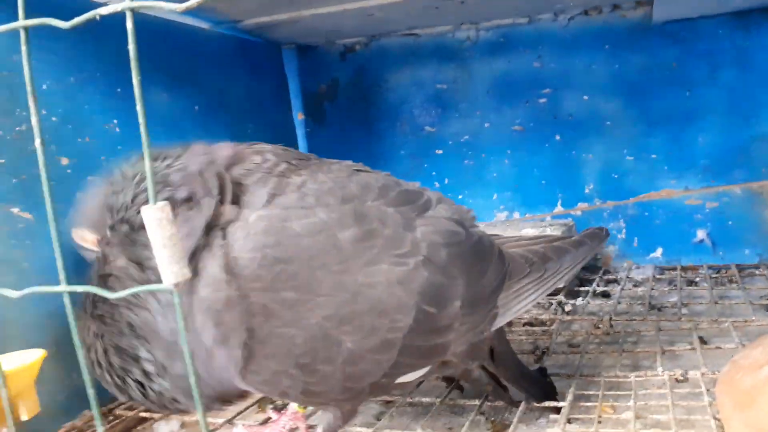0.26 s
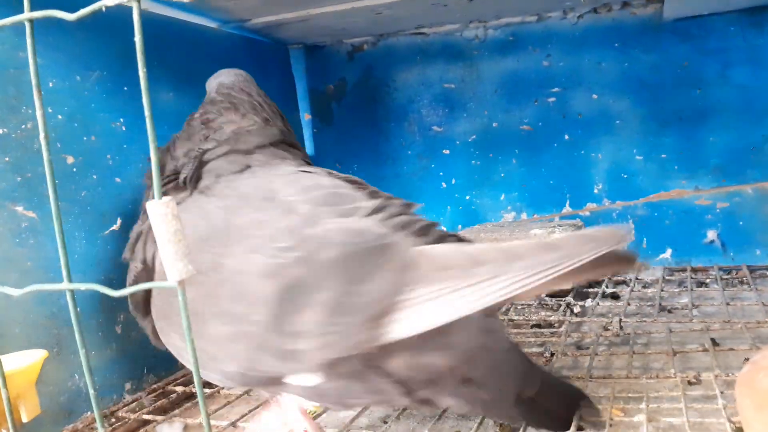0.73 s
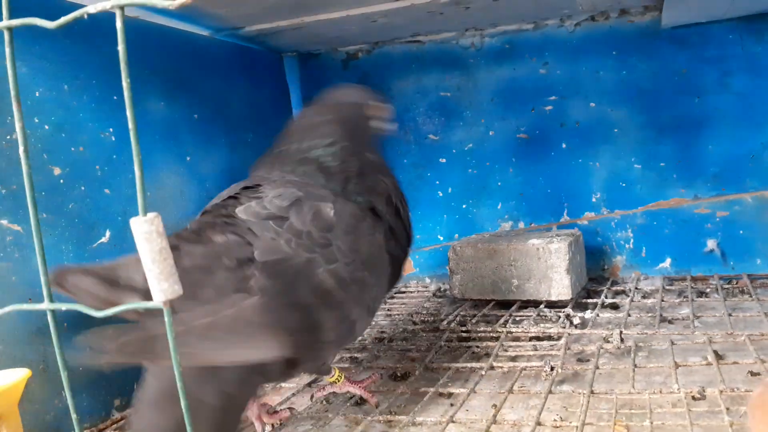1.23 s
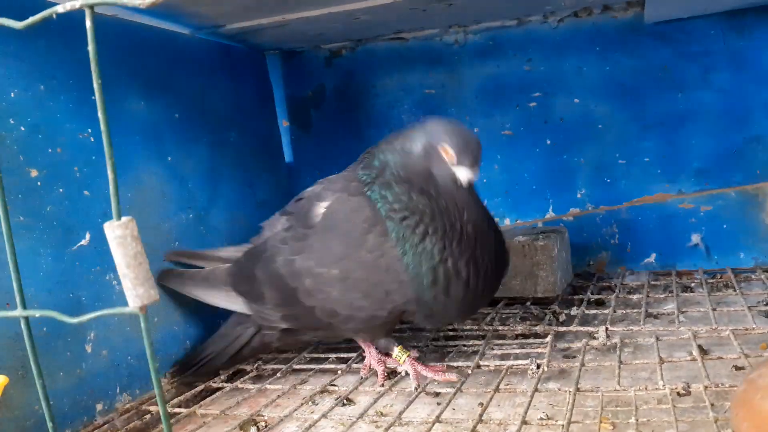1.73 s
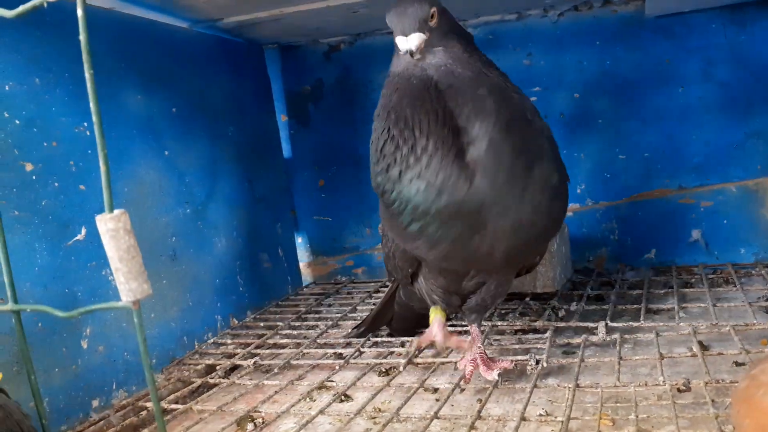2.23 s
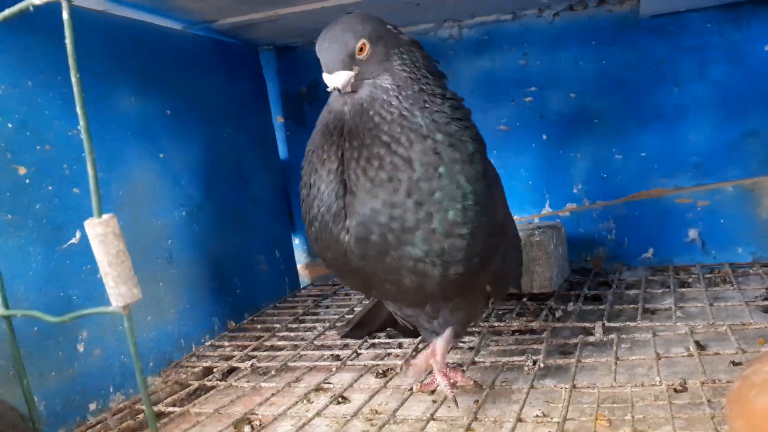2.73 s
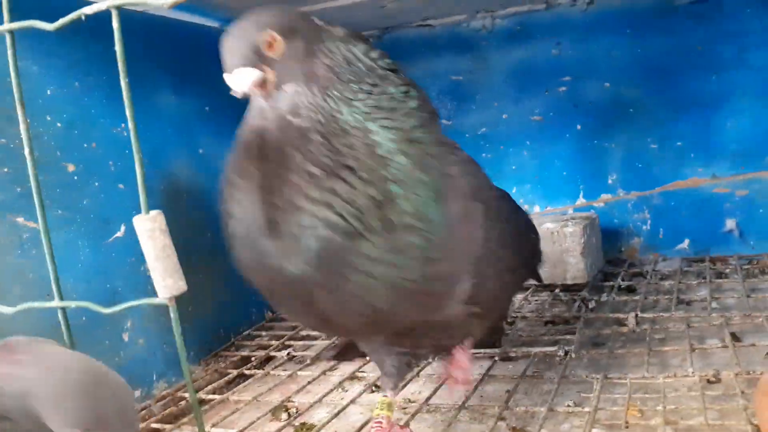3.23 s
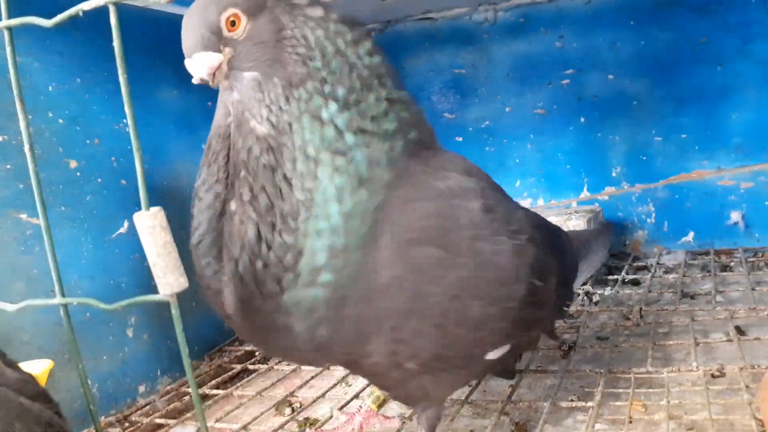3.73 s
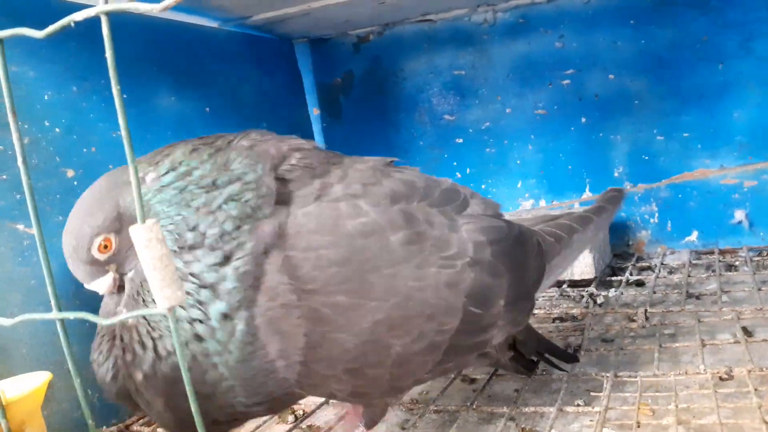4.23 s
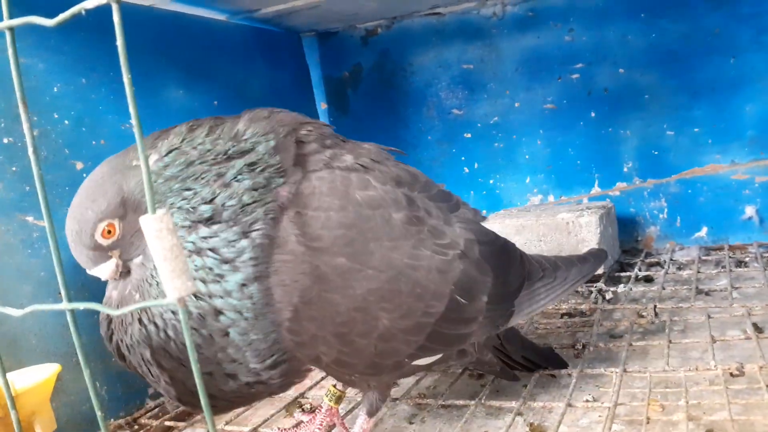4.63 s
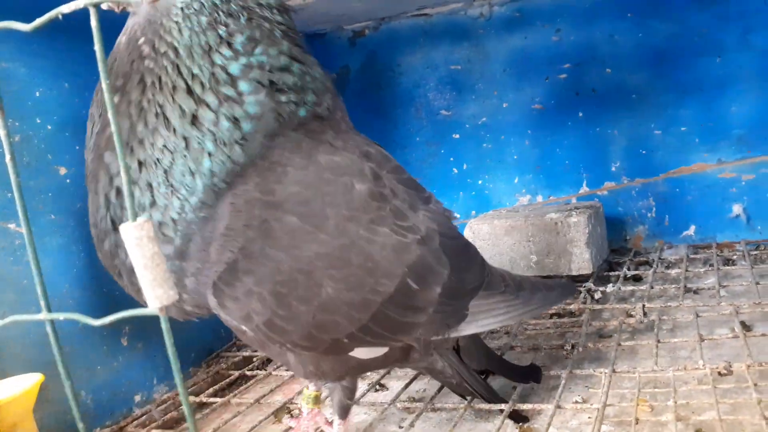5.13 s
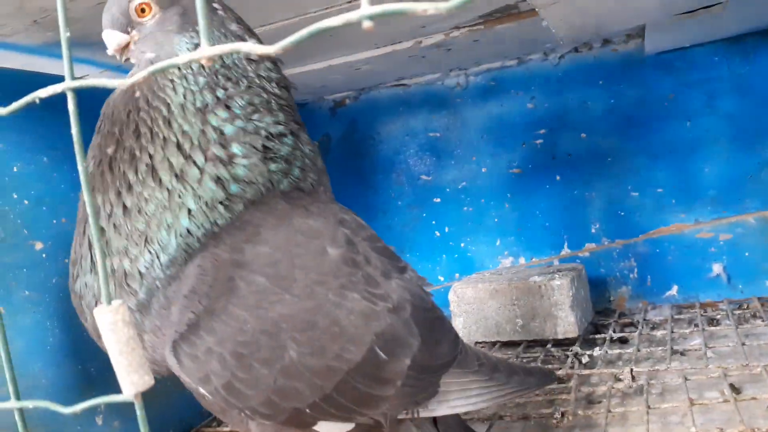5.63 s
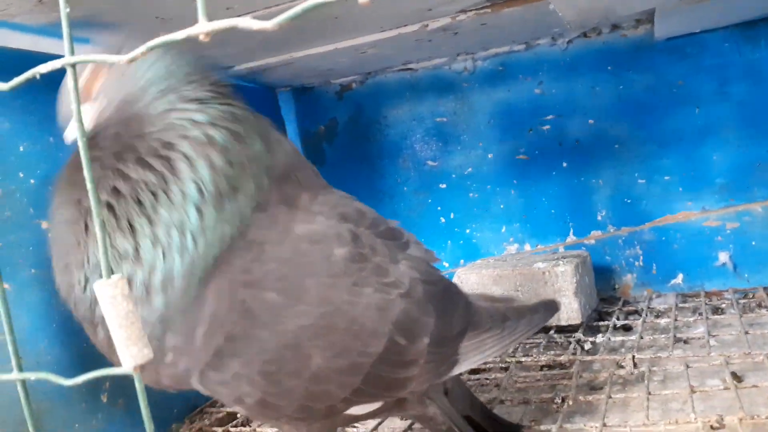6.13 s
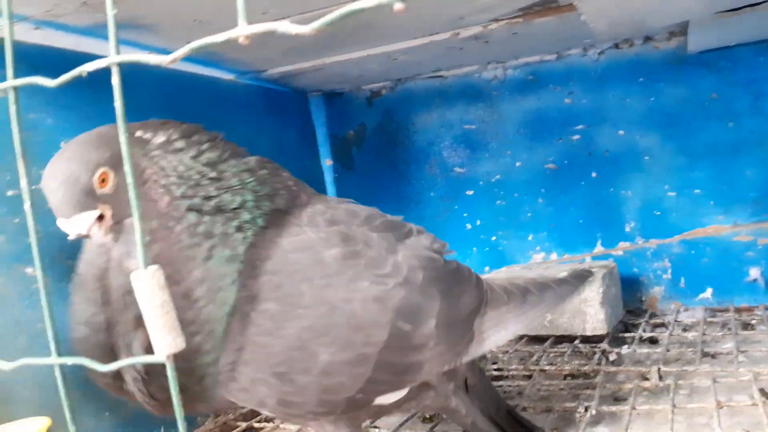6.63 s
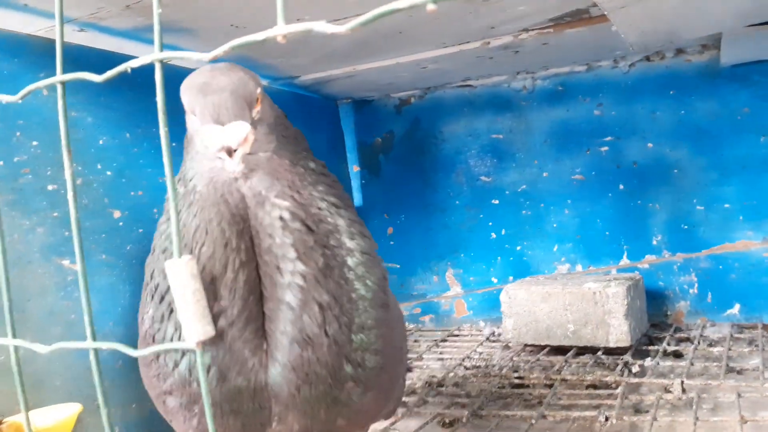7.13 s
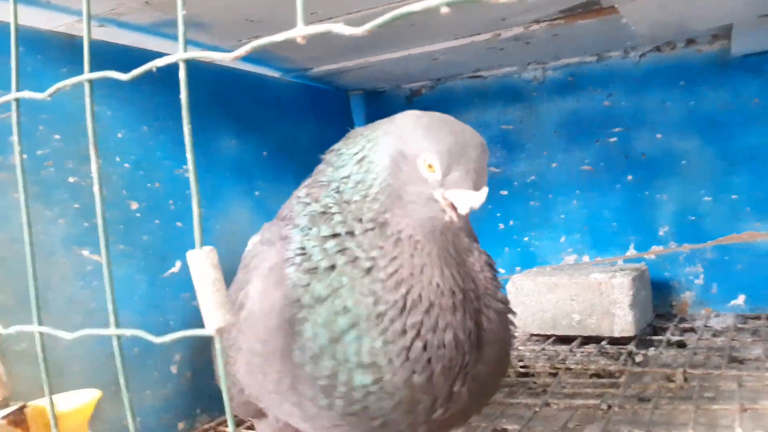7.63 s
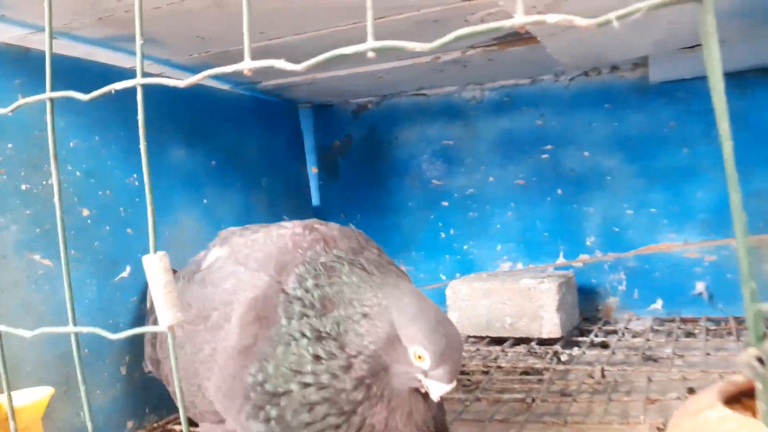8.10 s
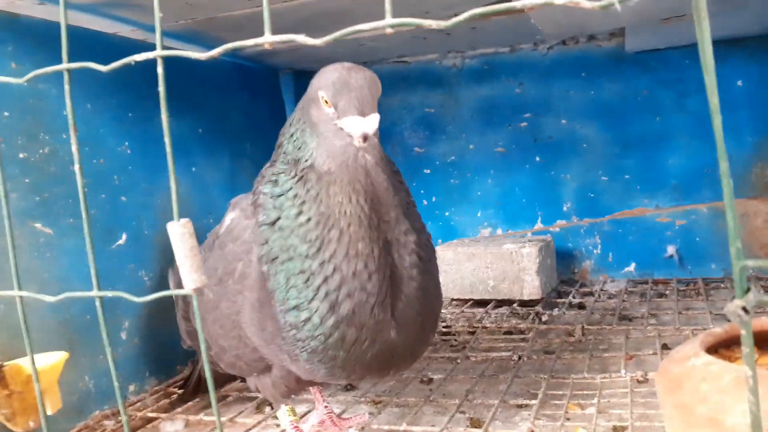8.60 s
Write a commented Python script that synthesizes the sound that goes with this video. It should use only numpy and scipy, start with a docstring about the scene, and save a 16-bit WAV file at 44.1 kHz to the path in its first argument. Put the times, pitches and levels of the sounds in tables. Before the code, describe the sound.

A male pigeon gives bursts of short throaty hoots sliding into deep falling coos, over the blurred murmur of many pigeons, with claws ticking on wire.

```python
"""In a closed pigeon loft, a phone listens at the wire front of one cock's box.
He hoots in short puffs that run into falling coos: gliding harmonics shaped by a throat curve, chopped by a roll.
Neighbours hold plain notes, and many overlapping far coos blur into a murmur over a low hum and rumble.
Noise bursts through resonances make claws on wire, scuffs, tinks of loose metal and a thin wheeze;
coloured hiss makes the feathers rustle."""
import sys
import numpy as np
from scipy import signal
from scipy.fft import rfft, irfft
from scipy.io import wavfile
from scipy.ndimage import uniform_filter1d

SR = 44100
rng = np.random.default_rng(int(sys.argv[2]) if len(sys.argv) > 2 else 0)


def master_out(mix):
    """Clip the mix to full scale and print it as 16-bit PCM to the path in sys.argv[1]."""
    frames = np.transpose(np.atleast_2d(mix))
    ceiling = np.clip(frames, -1, 1)
    pcm = np.round(ceiling * 32767).astype(np.int16)
    wavfile.write(sys.argv[1], SR, pcm)


N = 390726
T = np.arange(N) / SR
SIDES = np.array([[1], [-1]])  # left, right

# Leading coos, one curve a coo. Each row: time in seconds, pitch in Hz, level of the fundamental in dB.
COOS = [
    [(0.73, 320.7, -29.5), (0.82, 326.6, -28.5), (0.9, 293.8, -27), (1.02, 285, -29), (1.06, 278, -50)],
    [(1.85, 371, -19), (1.88, 355, -9.5), (1.895, 316, -23), (2.02, 274, -25.5), (2.08, 235.7, -31),
     (2.13, 184.7, -37.5), (2.17, 142, -43)],
    [(2.39, 437, -30.5), (2.49, 398, -31), (2.61, 403.7, -28.5), (2.66, 441, -37), (2.72, 402, -26.5),
     (2.77, 374.4, -31), (2.92, 365, -35.5)],
    [(4.39, 471, -13.5), (4.413, 438, -11.5), (4.46, 402, -8), (4.5, 378.6, -9.5), (4.517, 370, -16.5),
     (4.533, 362, -8), (4.548, 341.3, -19), (4.6, 283, -20), (4.66, 237.2, -33), (4.76, 165.5, -46),
     (4.8, 141.8, -59)],
    [(5.5, 271, -74), (5.66, 279, -50), (5.78, 361, -42), (5.9, 387, -47), (6.09, 385, -48)],
    [(8.44, 479, -30.5), (8.47, 331, -26), (8.51, 280, -38), (8.6, 252, -28.5), (8.73, 239.7, -32),
     (8.76, 227, -25.5), (8.8, 215, -41)],
]
# One value a coo: depth of the throat roll, 0-1.
COO_ROLL = [.2, .12, .3, .05, .25, .4]
# One value a coo: number of harmonics; the near cock's overtones carry, the neighbours' hardly.
COO_HARMONICS = [2, 5, 1, 9, 1, 1]
# Short puffs of the throat. Each row: time near the peak in seconds, peak in dB, pitch in Hz, length in seconds.
HOOTS = [(1.258, -19.5, 420, 0.022), (1.397, -22.5, 415, 0.016), (1.467, -22, 440, 0.021),
         (1.53, -25, 380, 0.029), (1.634, -7, 393.4, 0.029), (1.725, -5, 413, 0.025),
         (1.751, -8, 404, 0.026), (1.784, -7, 413, 0.018), (1.81, -5.5, 419, 0.032),
         (1.839, -5.5, 388.7, 0.04), (3.532, -24.5, 402, 0.034), (3.783, -18, 392, 0.02),
         (3.804, -15.5, 383, 0.032), (3.884, -12, 382, 0.02), (3.989, -15.5, 390, 0.017),
         (4.01, -13.5, 369, 0.021), (4.07, -20, 398, 0.019), (4.152, -3, 401.4, 0.028),
         (4.183, -12, 386, 0.035), (4.24, -3, 423, 0.022), (4.3, -5, 429, 0.013), (4.325, -9.5, 404, 0.031),
         (4.354, -6.5, 423, 0.019), (4.374, -7.5, 434, 0.012), (4.386, -8, 410, 0.015),
         (6.593, -21.5, 334, 0.0268), (6.961, -11.5, 378.3, 0.042), (7.321, -24.5, 400, 0.032),
         (7.428, -20.5, 297, 0.026), (7.452, -10.5, 365, 0.047), (7.537, -20.5, 418, 0.0298),
         (7.568, -18.5, 407, 0.035), (7.629, -13.5, 401, 0.027), (7.838, -11, 345, 0.014),
         (7.938, -13, 384, 0.025), (8.131, -16.5, 388, 0.028)]
# Plain notes of the neighbours, each a straight glide.
# Each row: start in seconds, length in seconds, first pitch in Hz, last pitch in Hz, level in dB.
NEIGHBOUR_NOTES = [(0.44, 0.15, 429.6, 344, -35.5), (0.73, 0.19, 391, 388.6, -27),
                   (2.548, 0.35, 213, 182, -43.5), (3.044, 0.44, 323, 313, -45),
                   (3.375, 0.1, 444, 382, -38.5), (3.443, 0.33, 225.3, 301, -45.5),
                   (3.658, 0.098, 392, 427, -34), (4.19, 0.21, 293, 276.6, -32),
                   (4.852, 0.39, 326.8, 304, -49), (5.114, 0.21, 406.7, 345, -46),
                   (5.61, 0.23, 504, 533, -50), (5.86, 0.2, 273, 299, -43), (6.202, 0.17, 416, 387, -43),
                   (6.681, 0.19, 454, 461, -33.5), (7.641, 0.13, 383.2, 370.3, -22.5),
                   (7.681, 0.16, 451, 442, -32), (7.955, 0.17, 399, 381, -25),
                   (8.17, 0.14, 516, 509, -36.5), (8.56, 0.53, 474, 480, -29.5),
                   (0.95, 0.12, 449.5, 640, -35.5), (0.27, 0.33, 265.4, 223.7, -37),
                   (0, 0.13, 318, 286, -37.5), (.29, 0.27, 493.6, 488, -43.5),
                   (2.17, 0.26, 355.2, 347, -33), (4.55, 0.15, 380, 397, -31.5),
                   (7.76, 0.2, 344, 330.2, -29), (8.135, 0.064, 373, 517, -27.5)]
# One value a plain note: depth of its roll, 0-1.
NOTE_ROLL = [.3, .3, .3, .1, .1, .2, .2, .2, .3, .2, .1, .2, .15, .1, .45, .5, .45, .2, .25, 1, .5, .3, .3,
             .2, .35, .75, .1]
# Puffed throat sac as a filter. Each row: frequency in Hz, gain in dB.
THROAT_SAC = [(140, -11), (250, -3.5), (390, 10), (520, -11), (800, -17), (1300, -29), (1900, -17.5),
              (2700, -43), (3400, -31)]
# Resonances that the breath excites. Each row: frequency in Hz, width in Hz, relative level in dB.
BREATH_MODES = [(810, 1200, 5.5), (1650, 800, -5.5), (3400, 700, -3.5)]
# Murmur of the flock over time. Each row: time in seconds, level in dB.
FLOCK_LEVEL = [(0, -42), (.36, -28), (.66, -37.5), (1, -33), (1.35, -30.5), (2.3, -31.5), (2.7, -39),
               (3.3, -46), (3.96, -28), (4.3, -38), (4.62, -33), (4.9, -45.5), (5.6, -48), (6.6, -32.5),
               (7.1, -35.5), (7.9, -28.5), (8.86, -42)]
# Colour of the far flock. Each row: frequency in Hz, gain in dB.
FLOCK_COLOUR = [(65, -47), (110, -17.5), (177, -10), (227, -4.5), (384, 0.5), (520, -8), (690, -19.5),
                (1300, -34), (1690, -60), (2860, -120)]
# Feathers and shuffling feet further off. Each row: time in seconds, level in dB.
RUSTLE_LEVEL = [(0, -53.5), (.7, -48), (1.4, -47.5), (2.64, -59.5), (3, -53.5), (3.3, -50.5), (3.63, -52),
                (3.96, -47.5), (4.62, -69), (4.95, -59), (5.7, -57.5), (6.4, -48.5), (7.26, -54),
                (7.6, -55), (8.2, -54), (8.6, -51.5), (8.86, -57.5)]
# Colour of the rustle through the microphone. Each row: frequency in Hz, gain in dB.
RUSTLE_COLOUR = [(410, -10), (700, 1), (945, -8.5), (1790, -11), (2360, -9), (2910, -11), (7070, -14),
                 (8720, -26), (11900, -16), (15900, -13.5)]
# Loose metal struck. Each row: start in seconds, level in dB.
TINKS = [(0.163, -47), (4.0678, -40), (5.153, -48.5), (6.1325, -53), (7.038, -37), (8.157, -50)]
# Resonances of the loose metal. Each row: frequency in Hz, width in Hz, relative level in dB.
TINK_MODES = [(2703, 92, -0.5), (6480, 430, 2.5), (6930, 1200, 0.5)]
# Feathers and feet scuffing the box. Each row: start in seconds, level of the wire part in dB,
# loudest frequency in Hz, top treble against the wire in dB, length in seconds.
SCUFFS = [(0.502, -48.5, 2100, -19, 0.066), (0.761, -40, 3860, -13, 0.081), (0.851, -48, 2390, -3, 0.056),
          (1.331, -47.5, 2054, -11.5, 0.045), (1.658, -45, 3810, 1.5, 0.12),
          (3.34, -42.5, 1350, -11.5, 0.066), (4.142, -50, 1500, -29, 0.075),
          (5.679, -50.5, 4870, 14.5, 0.085), (5.743, -45.5, 4200, -9, 0.068),
          (6.574, -38.5, 5000, -7.5, 0.07), (6.615, -37, 2490, -13.5, 0.06), (6.897, -44, 4670, 0.5, 0.08),
          (6.925, -42.5, 6930, -22, 0.13), (7.293, -48, 2570, -32, 0.096), (7.413, -39.5, 4010, -30, 0.1),
          (8.539, -45, 7290, 6.5, .055), (8.599, -44, 2470, -26, 0.046)]
# Claws on the wire floor. Each row: start in seconds, level in dB.
CLAWS = [(0.627, -44.5), (0.9686, -46.5), (1.297, -35.5), (2.2266, -38), (3.19, -47.5), (3.226, -42),
         (3.257, -36), (3.316, -45.5), (3.466, -47.5), (3.687, -47.5), (3.713, -43), (3.984, -41),
         (4.014, -45.5), (4.247, -38), (4.6573, -52.5), (4.9824, -46.5), (5.265, -51), (5.422, -47),
         (5.588, -58), (5.658, -44), (5.849, -46.5), (5.881, -43.5), (5.915, -45.5), (6.028, -51.5),
         (6.132, -40.5), (6.2994, -37.5), (6.383, -47), (6.514, -36.5), (6.566, -33.5), (6.7023, -40.5),
         (6.7706, -42.5), (6.877, -41), (7.806, -46), (7.9593, -35.5), (8.373, -41), (8.707, -48)]
# Resonances of the wire mesh. Each row: frequency in Hz, width in Hz, relative gain in dB.
WIRE_MODES = [(1400, 2000, 2.5), (2470, 450, 3), (3960, 1000, 3), (5500, 3100, 0.5), (7300, 1100, 8),
              (11600, 2600, 1.5)]
# One claw squeaking along a wire: start in seconds, length in seconds, first and last pitch in Hz, level in dB.
SQUEAK = (6.93, 0.065, 3850, 4400, -42.5)
# Resonances of the wheeze. Each row: frequency in Hz, width in Hz, level in dB.
WHEEZE_MODES = [(2500, 350, -59), (4200, 790, -58.5)]
# The microphone port, which dips in the treble. Each row: frequency in Hz, gain in dB.
MIC_PORT = [(200, 9), (7000, -2), (8800, -9), (11500, -3.5), (20000, -6)]

# Voices
OVERTONE_FALL_DB = -11.5  # loss at the syrinx for each doubling of the harmonic number
BREATH_DB = -46.5  # scale of the air noise before it follows the voice
SWELL_S, RELEASE_S = 0.011, 0.036  # of a plain note
DRONE_HZ, DRONE_WIDTH_HZ, DRONE_DB = 161.6, 30, -56
RUMBLE_SIDE_DB = -16.5  # unlike part of the rumble against the shared part
# Box walls: the nearer birds are drier than the flock; the ports hear unlike tails only above BOX_SIDE_HZ
BOX_T60_S, BOX_FLOCK_DB, BOX_NEAR_DB = 0.16, -8, -14
BOX_SIDE_HZ, BOX_SIDE_DB = 545, 7
# Wire, metal and feathers
FAINT_CLAWS, FAINT_CLAW_DB = 110, -60  # count and lowest level of soft steps at random moments
CLAW_TICK_S, CLAW_RING_S, TINK_RING_S = 0.023, 0.14, 0.13  # times to fall by 60 dB
CLAW_RING_DB = -2  # ring against the crisp tick
PING_DB, PING_WIDTH_HZ = -10, 260  # single wires against the mesh
SWISH_DB = -4.5  # loud region of a scuff against the wire
SLIDE = 0.08  # share of its pitch that a swish slides, scaled at random
WHEEZE_S, WHEEZE_LENGTH_S = 7.5, 0.4
# Two microphone ports: level left against right, in dB
BASS_LEFT_DB, OVERTONE_LEFT_DB, OVERTONE_HZ = 2.3, -0.5, 516  # voices below and above OVERTONE_HZ
TREBLE_LEFT_DB, TREBLE_HZ = 2, 3600  # other sounds above TREBLE_HZ; the opposite lean below
LEFT_LEAD_SAMPLES = 3  # the voices reach the left port first
TOP_HZ = 15900


def undb(db):
    return 10 ** (np.asarray(db) / 20)


def unit(x):
    """Scale to an RMS of 1."""
    return x / np.sqrt(np.mean(x ** 2))


def coloured(x, points):
    """Filter by (Hz, dB) points joined on a log axis."""
    hz, db = np.transpose(points)
    f = np.arange(N // 2 + 1) * SR / N
    gain_db = np.interp(np.log(f + 1), np.log(hz), db, -90, -90)
    return irfft(rfft(x) * undb(gain_db), N)


def lowpass(order, hz):
    return signal.butter(order, hz, fs=SR, output="sos")


def band(x, hz, width_hz):
    return signal.lfilter(*signal.iirpeak(hz, hz / width_hz, SR), x)


def sharp_band(x, hz, width_hz):
    return band(band(x, hz, width_hz), hz, width_hz)


def resonances(noise, modes):
    """Ring noise in sharp bands, each set to its own level."""
    return sum(undb(db) * unit(sharp_band(noise, hz, width)) for hz, width, db in modes)


def wire_mesh(shake, mix, spread_db):
    """Shake the wire's resonances, their balance varied by a random mix."""
    parts = zip(WIRE_MODES, mix)
    return unit(sum(undb(db + spread_db * m) * band(shake, hz, width) for (hz, width, db), m in parts))


def walk(rate):
    """Random levels held 1 / rate s and slewed twice; spread near 1."""
    k = int(SR / rate)
    steps = np.repeat(rng.standard_normal(N // k + 1), k)
    return 1.274 * uniform_filter1d(uniform_filter1d(steps, k), k)[:N]


def add(out, s, x):
    """Mix x into out from s seconds on."""
    i = max(int(s * SR), 0)
    out[..., i:i + x.shape[-1]] += x[..., :N - i]


def lean(left_db):
    """Gains of the two ports for a level difference."""
    return undb(left_db * SIDES / 2)


def throat_db(hz):
    """The puffed throat sac favours some frequencies over others."""
    sac_hz, sac_db = np.transpose(THROAT_SAC)
    return np.interp(np.log(hz), np.log(sac_hz), sac_db)


def note(hz, db, roll, roll_hz, count, fade_s=0.0075):
    """Syrinx harmonics pass the throat sac, db setting the fundamental; the roll chops their level."""
    t = np.arange(len(hz)) / SR
    phase = 2 * np.pi * np.cumsum(hz) / SR
    tone = np.sin(phase)
    for k in range(2, count + 1):
        # each overtone wavers on its own with the air stream
        waver = 1 + 0.55 * unit(band(rng.standard_normal(len(t)), 45, 60))
        overtone_db = OVERTONE_FALL_DB * np.log2(k) + throat_db(k * hz) - throat_db(hz)
        tone += waver * undb(overtone_db) * np.sin(k * phase)
    # a fully rolled note rolls faster and breaks into a croak
    roll_phase = 2 * np.pi * np.cumsum(roll_hz * (1 + 1.6 * roll ** 4)) / SR
    chop = 1 + np.clip(roll, 0, 1) * np.sin(roll_phase)
    chop *= 1 + roll ** 2 * unit(signal.sosfilt(lowpass(4, 120), rng.standard_normal(len(t))))
    fade = np.clip(np.minimum(t, t[-1] - t) / fade_s, 0, 1)
    return np.sqrt(2) * undb(db) * tone * chop * fade


def flock(count=260):
    """Many far coos of random pitch, glide and roll overlap with noise into an evenly loud murmur."""
    coos, roll_hz, wobble = np.zeros(N), 32 + 8 * walk(8.755), 1 + 0.02984 * walk(19)
    for when, pitch, glide, length, loud, roll in rng.random((count, 6)):
        u = np.linspace(0, 1, int((0.05 + 0.25 * length ** 2.2) * SR))
        start = int(when * (N - len(u)))
        span = slice(start, start + len(u))
        hz = 175 * 3.2 ** pitch * (1 + (0.15 - 0.45 * glide) * u) * wobble[span]
        db = 6 * loud + 20 * np.log10(np.sin(np.pi * u) + 0.01)
        add(coos, start / SR, note(hz, db, 0.6 * roll, roll_hz[span], count=1))
    murmur = coloured(unit(coos) + undb(10.5) * rng.standard_normal(N), FLOCK_COLOUR)
    return murmur / np.sqrt(uniform_filter1d(murmur ** 2, size=SR // 3))


def rumble(stir_db):
    """Deep band noise, nearly alike at both ports, rises and falls with the rustle."""
    mid, side = rng.standard_normal((2, N))
    noise = mid + undb(RUMBLE_SIDE_DB) * side * SIDES
    level_db = -56.5 + 0.73 * (stir_db + 56) + walk(27)
    return unit(band(band(noise, 70, 43), 82, 90)) * undb(level_db)


def drone():
    """A low hum that never stops: narrow noise whose level wanders."""
    hum = unit(sharp_band(rng.standard_normal(N), DRONE_HZ, DRONE_WIDTH_HZ))
    return undb(DRONE_DB + 2.2 * walk(7.8)) * hum


def rustle():
    """Unrelated hiss left and right; treble bands flicker apart, as different feathers and wires scrape."""
    rest = np.array([unit(coloured(rng.standard_normal(N), RUSTLE_COLOUR)) for _ in range(2)])
    out = 0
    for hz in np.geomspace(1300, 16000, 7):
        part = signal.sosfiltfilt(lowpass(3, hz), rest)
        out = out + part * undb(3.1 * walk(30))
        rest = rest - part
    return out * undb(1.4 * walk(13) + 1.76 * walk(90))


def neighbour_notes(roll_hz):
    """Plain syrinx notes swell, glide with a slight waver, and let go."""
    out, waver = np.zeros(N), 1 + 0.02 * walk(18)
    for (s, length, first_hz, last_hz, db), roll in zip(NEIGHBOUR_NOTES, NOTE_ROLL):
        span = slice(int(s * SR), int((s + length) * SR))
        t = T[span] - s
        hz = (first_hz + (last_hz - first_hz) * t / length) * waver[span]
        shape = np.clip(np.minimum(t / SWELL_S, (length - t) / RELEASE_S), 0, 1)
        # deeply rolled notes gain a second harmonic
        add(out, s, shape * note(hz, db, roll, roll_hz[span], count=1 + (roll > 0.5)))
    return out


def box(x):
    """The walls of the box return a short dull tail, alike at both ports in the bass."""
    t = np.arange(int(0.3 * SR)) / SR
    decay = 1000. ** (-t / BOX_T60_S) * (t > 0.003)
    mid, side = rng.standard_normal((2, len(t))) * decay
    side = signal.sosfilt(signal.butter(2, BOX_SIDE_HZ, "highpass", fs=SR, output="sos"), side)
    tail = (mid + undb(BOX_SIDE_DB) * side * SIDES) / np.sqrt(np.sum(mid ** 2))
    return signal.fftconvolve(x[None], tail, axes=1)[:, :N]


def breath(voice):
    """Hoarse air noise rides on the voice and lingers a little after each puff."""
    rasp = resonances(rng.standard_normal((2, N)), BREATH_MODES)
    power = uniform_filter1d(voice ** 2, size=1300) + 1e-12
    return undb(BREATH_DB) * rasp * power ** 0.39


def tinks():
    """A small loose metal part jingles briefly: noise in its resonances."""
    out, t = np.zeros((2, N)), np.arange(SR // 8) / SR
    shape = 1000. ** (-t / TINK_RING_S) * np.clip(t / 0.0014, 0, 1)
    for s, db in TINKS:
        ring = resonances(rng.standard_normal((2, len(t))), TINK_MODES)
        add(out, s, undb(db) * ring * shape)
    return out


def scuffs():
    """A gritty noise swell with one sliding loud region rings the wire a little; quick slips break it up."""
    out, grit = np.zeros((2, N)), undb(3.3 * walk(120))
    mixes = rng.standard_normal((len(SCUFFS), len(WIRE_MODES)))
    for (s, db, hz, top_db, length), mix in zip(SCUFFS, mixes):
        u = np.linspace(0, 1, int(max(length, 0.02) * SR))
        drag = rng.standard_normal((2, len(u)))
        top = unit(band(drag, 12500, 5000))
        wire = wire_mesh(drag, mix, 2.4)
        # low noise shifted up around a sliding tone
        slide = 2 * np.pi * np.cumsum(hz * (1 + SLIDE * mix[0] * (u - 0.5))) / SR
        swish = signal.lfilter(*signal.butter(2, 0.16 * hz, fs=SR), drag) * np.sin(slide)
        body = undb(SWISH_DB) * unit(swish) + wire + undb(top_db) * top
        add(out, s, undb(db) * body * np.sin(np.pi * u ** 0.6) ** 1.2)
    return out * grit


def claws():
    """A claw strike shakes the mesh: a noise burst in a random mix of resonances, and two thin wires ping."""
    out, t = np.zeros((2, N)), np.arange(SR // 8) / SR
    faint = [(when * N / SR, FAINT_CLAW_DB + 8 * loud) for when, loud in rng.random((FAINT_CLAWS, 2))]
    strikes = CLAWS + faint
    decay = 1000. ** (-t / CLAW_TICK_S) + undb(CLAW_RING_DB) * 1000. ** (-t / CLAW_RING_S)
    shape = decay * np.clip(t / 0.0024, 0, 1)
    for (s, db), mix in zip(strikes, rng.standard_normal((len(strikes), len(WIRE_MODES)))):
        shake = rng.standard_normal((2, len(t)))
        pings = sum(unit(band(shake, hz, PING_WIDTH_HZ)) for hz in 2200 * 3.3 ** rng.random(2))
        add(out, s, undb(db) * (wire_mesh(shake, mix, 1.4) + undb(PING_DB) * pings) * shape)
    return out


def coos(roll_hz):
    """The leading coos: syrinx notes that follow drawn curves of pitch and level."""
    out = np.zeros(N)
    for rows, roll, count in zip(COOS, COO_ROLL, COO_HARMONICS):
        s, *columns = np.transpose(rows)
        span = slice(int(s[0] * SR), int(s[-1] * SR))
        hz, db = (np.interp(T[span], s, column) for column in columns)
        add(out, s[0], note(hz, db, roll, roll_hz[span], count))
    return out


def hoots():
    """Each throat puff swells fast, dies more slowly and sags in pitch, with a faint partial above."""
    out = np.zeros(N)
    for s, db, hz, length in HOOTS:
        u = np.linspace(0, 1, int(max(length, 0.008) * SR))
        phase = 2 * np.pi * np.cumsum(hz * (1.02 - 0.041 * u)) / SR
        tone = undb(db) * (np.sin(phase) + undb(-32.5) * np.sin(1.85 * phase))
        add(out, s - 0.2753 * length, np.sin(np.pi * u ** 0.59) ** 2 * tone)
    return out


def squeak():
    """A claw drags along a wire: a short rising tone roughened by noise."""
    out, (s, length, first_hz, last_hz, db) = np.zeros(N), SQUEAK
    u = np.linspace(0, 1, int(length * SR))
    tone = np.sin(2 * np.pi * np.cumsum(first_hz + (last_hz - first_hz) * u) / SR)
    rough = 1 + 0.6 * unit(band(rng.standard_normal(len(u)), 90, 160))
    add(out, s, undb(db) * tone * rough * np.sin(np.pi * u))
    return out


def wheeze():
    """Thin air noise in two resonances, swelling and fading once."""
    out, air = np.zeros((2, N)), rng.standard_normal((2, int(WHEEZE_LENGTH_S * SR)))
    add(out, WHEEZE_S, resonances(air, WHEEZE_MODES) * np.sqrt(np.hanning(air.shape[1])))
    return out


def scene():
    """Voices with their box tail lean by register; feet and feathers lean by treble."""
    far = flock() * undb(np.interp(T, *np.transpose(FLOCK_LEVEL)))
    stir_db = np.interp(T, *np.transpose(RUSTLE_LEVEL))
    roll_hz = 36 + 13 * walk(30)
    near = neighbour_notes(roll_hz) + coos(roll_hz) + hoots()
    tail = box(undb(BOX_NEAR_DB) * near + undb(BOX_FLOCK_DB) * far)
    voices = near + far + rumble(stir_db) + drone() + tail

    body = signal.sosfiltfilt(lowpass(5, OVERTONE_HZ), voices)
    upper = voices - body + breath(near)
    left, right = lean(BASS_LEFT_DB) * body + lean(OVERTONE_LEFT_DB) * upper
    voices = np.array([np.roll(left, -LEFT_LEAD_SAMPLES), right])

    through_port = coloured(claws() + scuffs() + squeak(), MIC_PORT)
    feet = through_port + tinks() + wheeze() + rustle() * undb(stir_db)
    low = signal.sosfiltfilt(lowpass(2, TREBLE_HZ), feet)
    tilt = lean(TREBLE_LEFT_DB)
    return voices + low / tilt + (feet - low) * tilt


def record(dry):
    """The phone cuts the deep bass and the top."""
    low_cut = signal.butter(3, 48, "highpass", fs=SR, output="sos")
    top_cut = signal.ellip(10, 0.2, 80, TOP_HZ, fs=SR, output="sos")
    return signal.sosfilt(top_cut, signal.sosfilt(low_cut, dry))


dry = scene()
out = record(dry)
master_out(out)
```